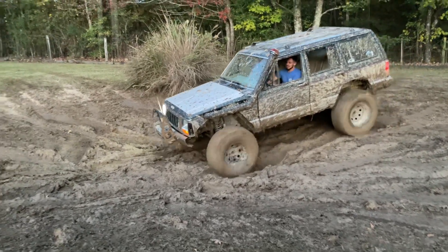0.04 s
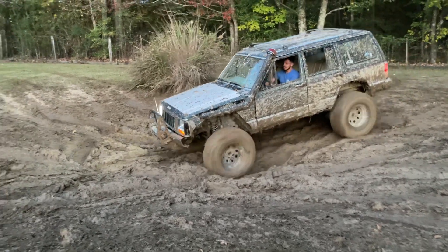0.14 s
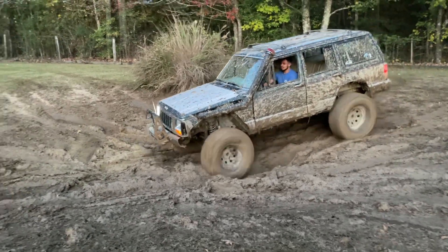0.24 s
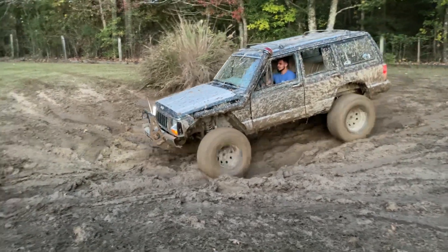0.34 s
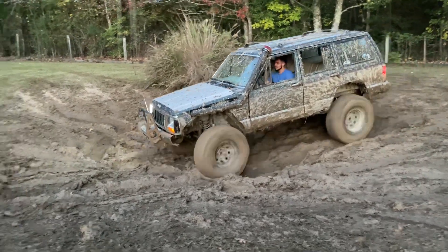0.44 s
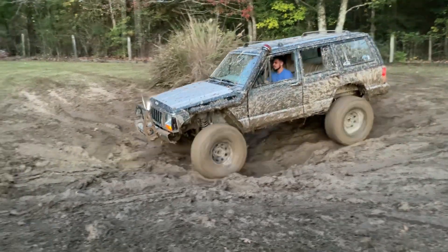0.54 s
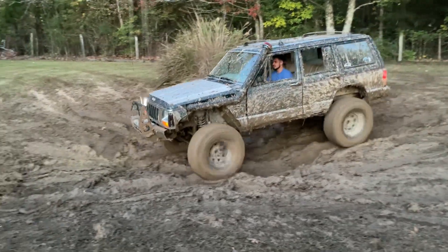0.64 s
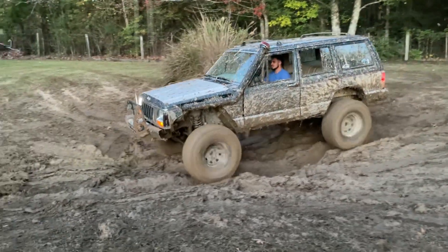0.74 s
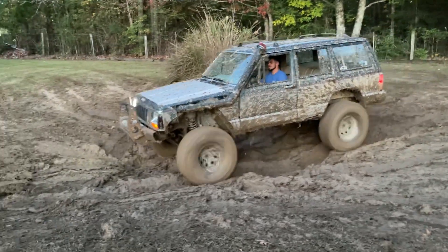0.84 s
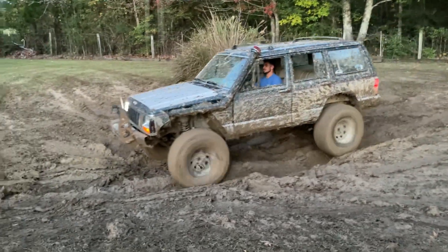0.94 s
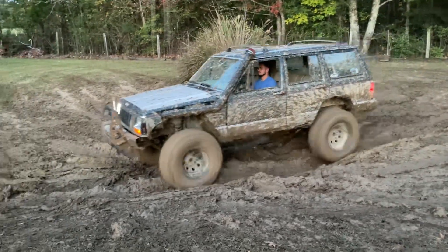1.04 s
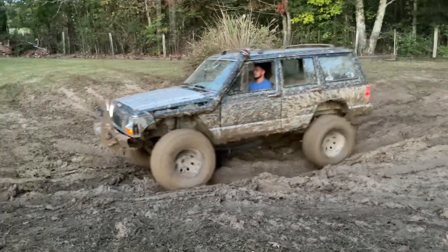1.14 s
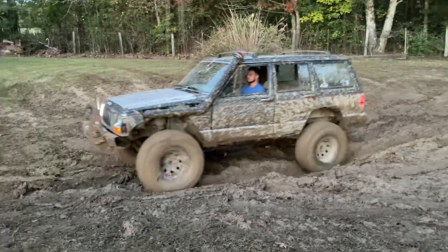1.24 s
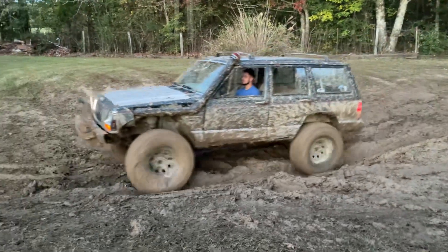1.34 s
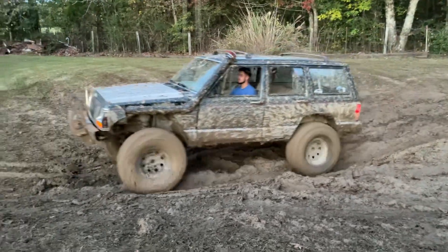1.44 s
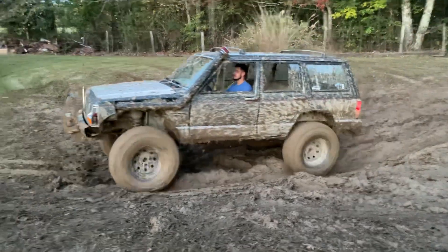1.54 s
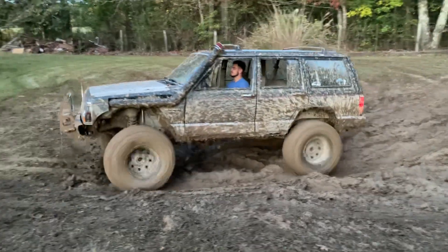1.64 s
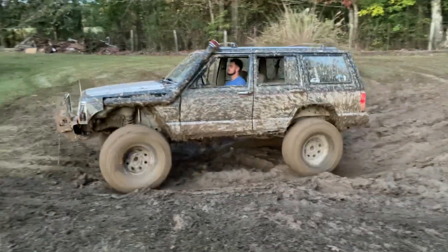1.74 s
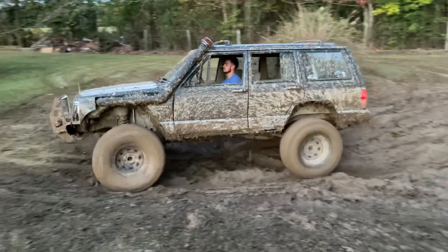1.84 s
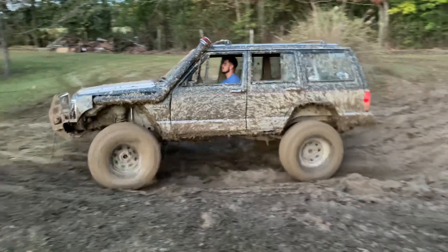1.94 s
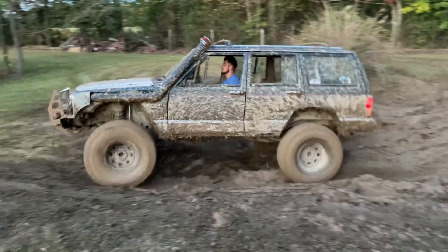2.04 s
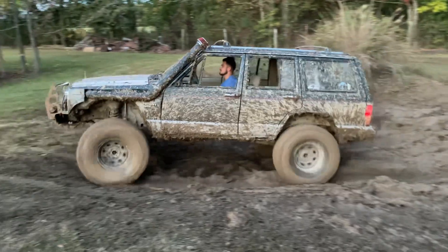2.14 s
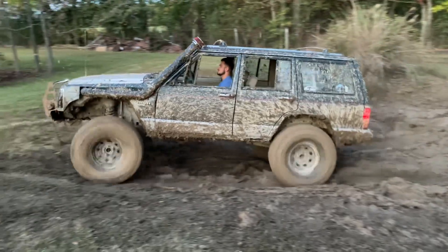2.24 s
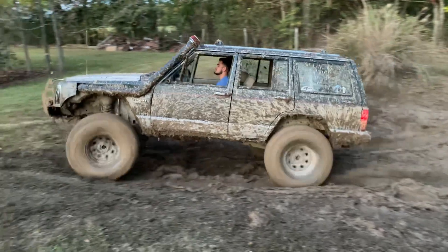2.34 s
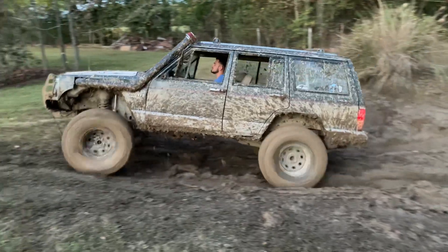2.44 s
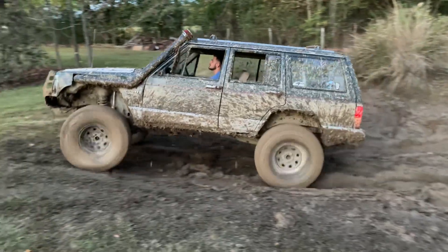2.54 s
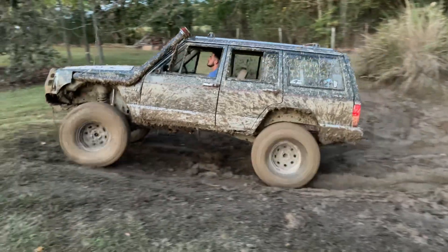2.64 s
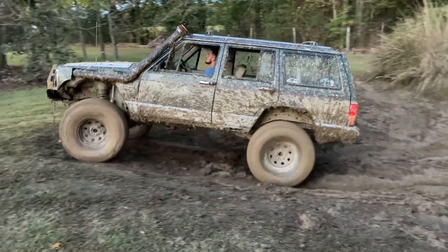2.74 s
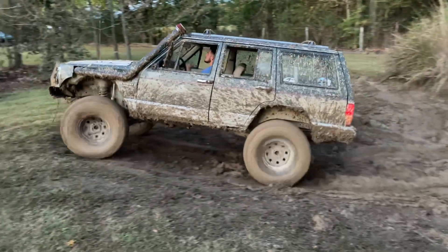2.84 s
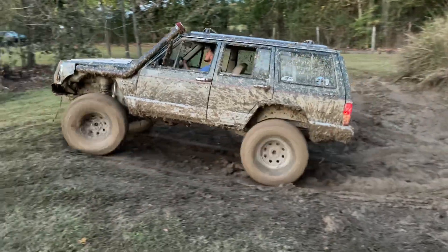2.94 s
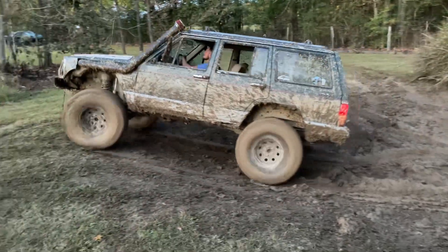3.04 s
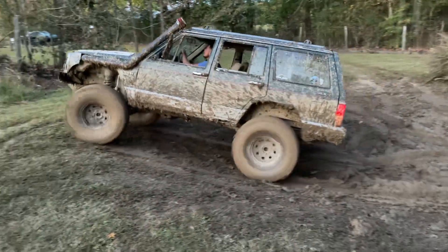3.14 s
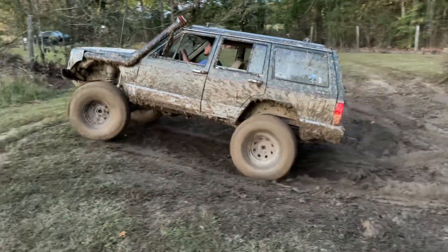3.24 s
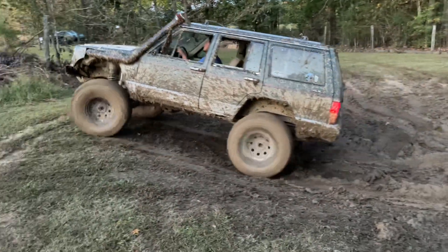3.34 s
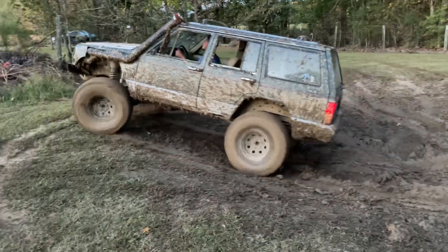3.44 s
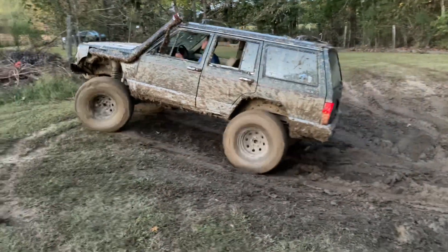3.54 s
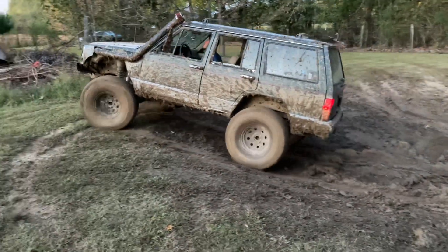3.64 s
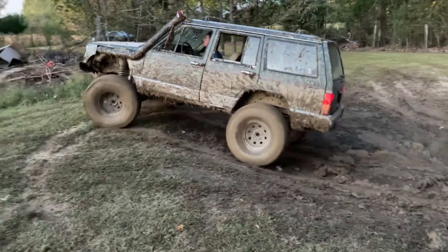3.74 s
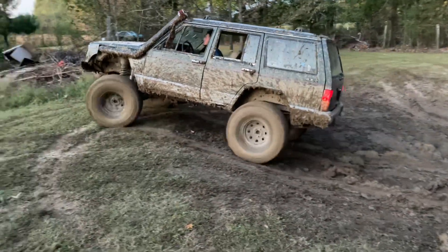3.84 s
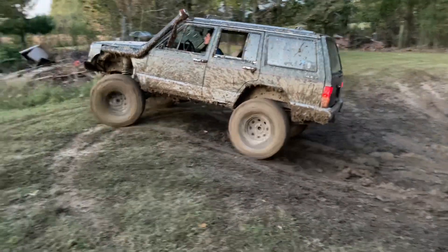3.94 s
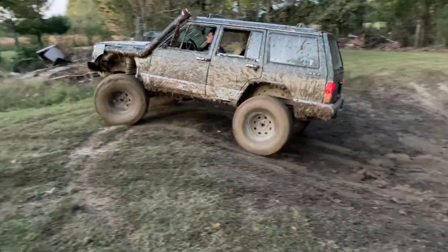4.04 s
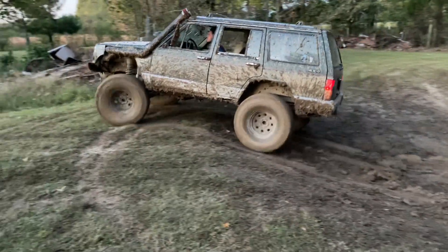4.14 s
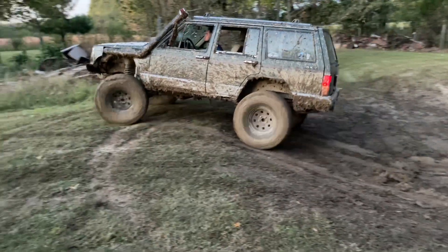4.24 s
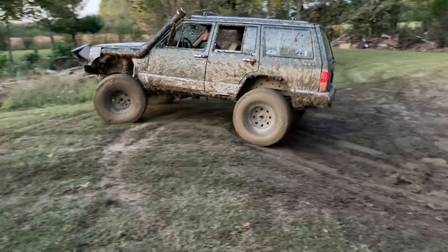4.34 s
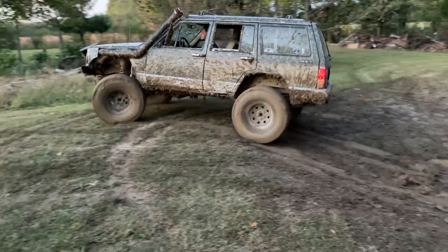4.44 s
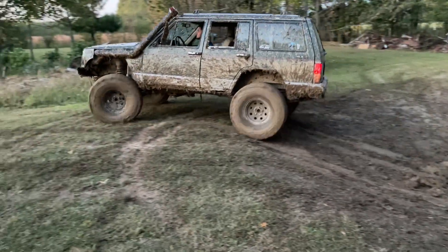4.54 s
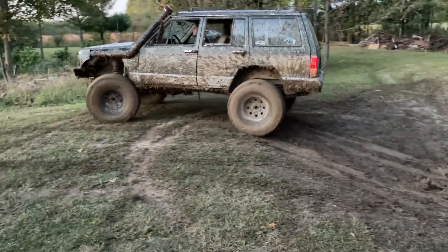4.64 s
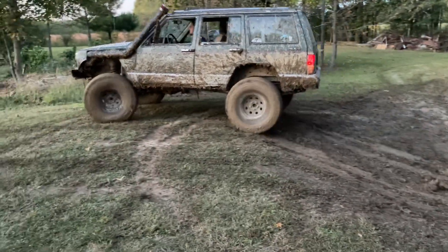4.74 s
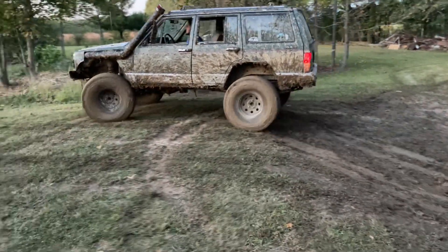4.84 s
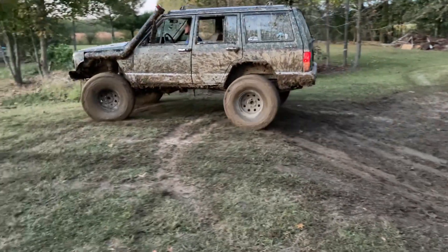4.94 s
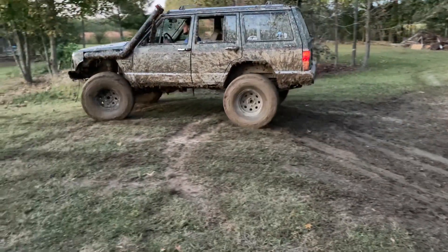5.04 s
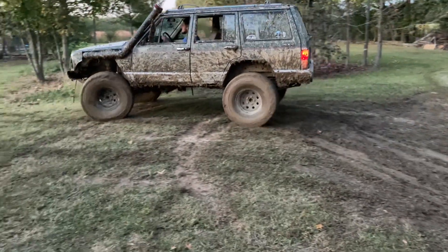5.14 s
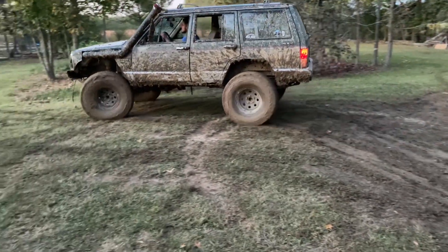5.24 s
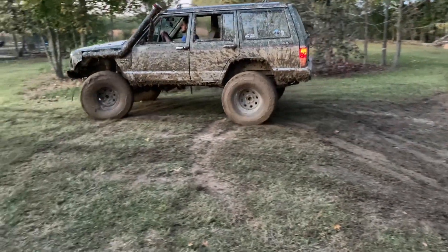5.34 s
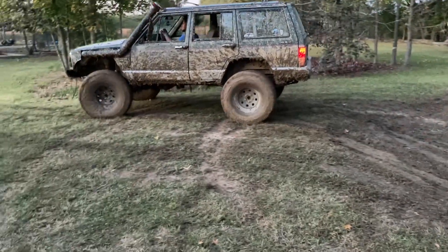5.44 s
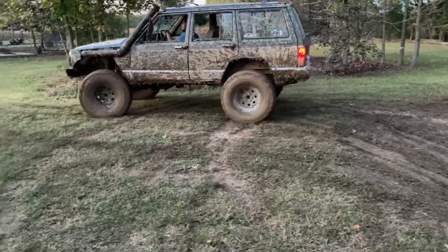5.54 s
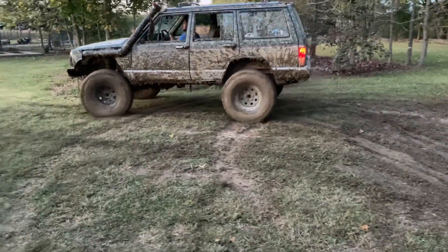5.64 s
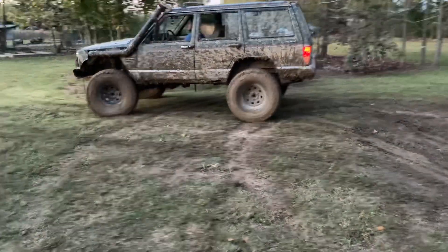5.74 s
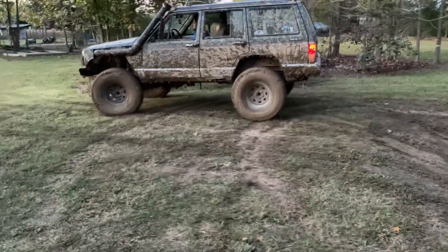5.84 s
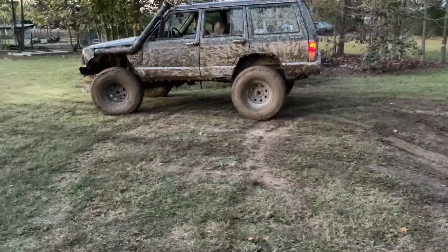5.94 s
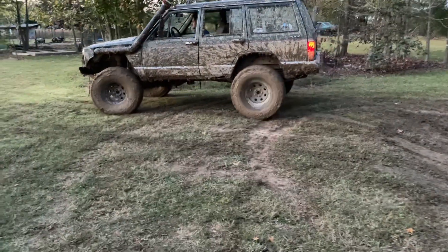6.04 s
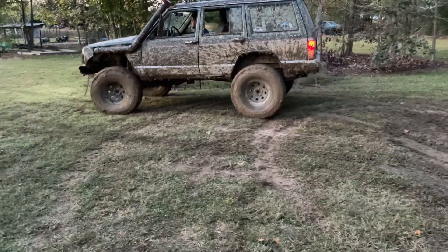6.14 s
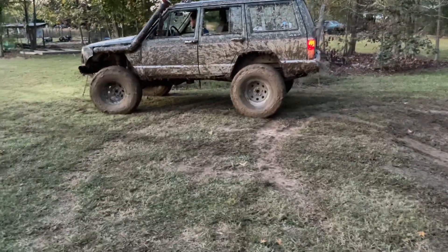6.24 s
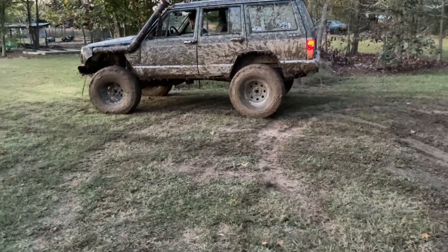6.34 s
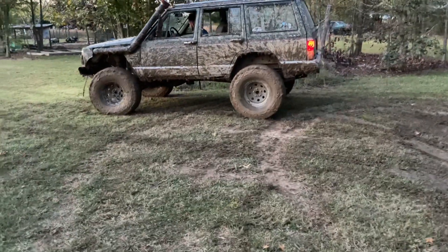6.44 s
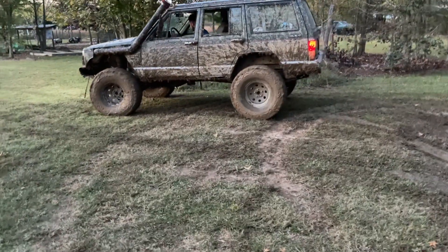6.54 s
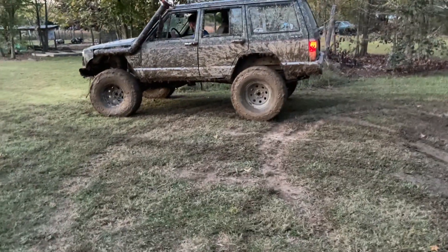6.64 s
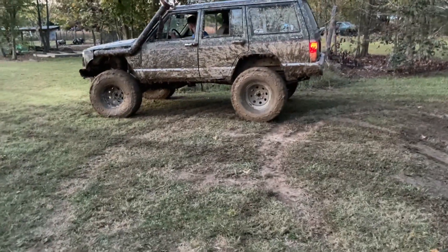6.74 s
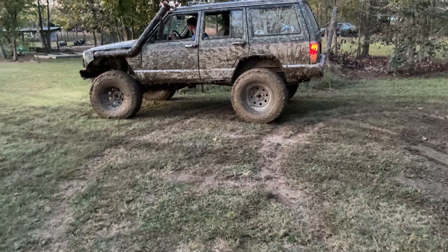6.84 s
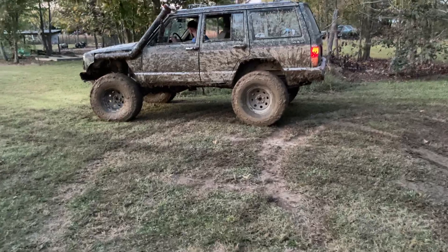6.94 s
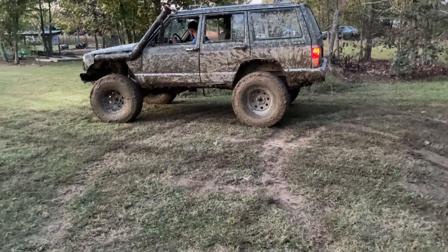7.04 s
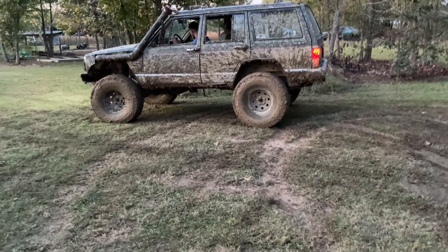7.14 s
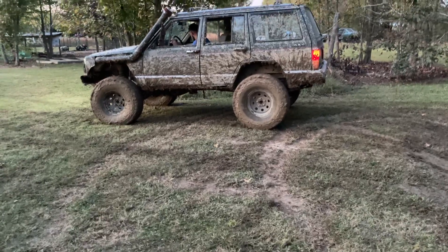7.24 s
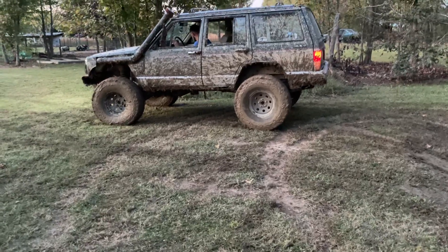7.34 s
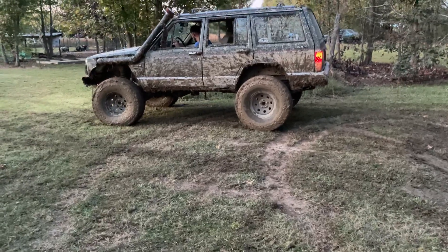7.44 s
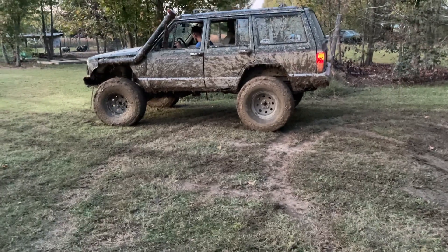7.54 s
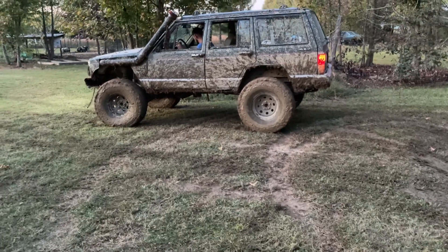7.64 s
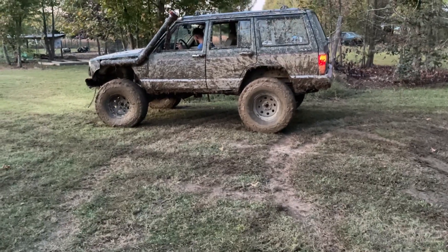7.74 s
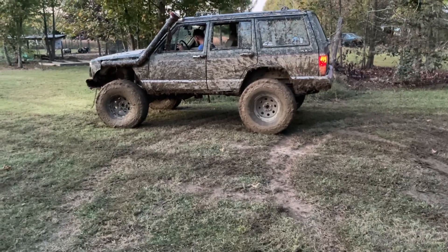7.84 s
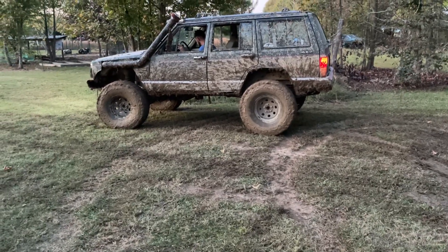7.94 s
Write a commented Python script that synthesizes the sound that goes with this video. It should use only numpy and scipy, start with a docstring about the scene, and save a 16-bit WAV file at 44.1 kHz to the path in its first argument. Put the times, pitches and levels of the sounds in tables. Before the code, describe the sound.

Outdoors, close to a six-cylinder off-road car with an open exhaust. The engine is already climbing and screams to a loud roar, falls, surges again to its highest pitch, then gives three shorter blips. Sharp cracks and dull booms punctuate the falling revs. After four seconds it sinks quickly to a quiet, hissing, ticking idle over a faint low rumble. Close stereo, slightly overloaded at the peaks, short reflections off ground and trees.

```python
"""Six-cylinder car revved outdoors

An off-road car with an open exhaust is revved five times, then falls to idle.
Sines drone at the firing rate; crank orders and random firings growl through pipe resonances.
Noise puffed at each firing is the roar; noise bursts and ringing notes are the pops and booms.
A low rumble and a faint whine lie beneath; two close microphone ports hear it all."""
import sys
import numpy as np
from scipy import signal
from scipy.fft import rfft, irfft, next_fast_len
from scipy.io import wavfile
from scipy.ndimage import uniform_filter1d

SR = 44100
rng = np.random.default_rng(int(sys.argv[2]) if len(sys.argv) > 2 else 0)


def dump_mix(stems):
    """Bounce the given channels to the path in sys.argv[1] as a 16-bit WAV at rate SR."""
    frames = np.atleast_2d(stems).T  # one column per channel
    limited = np.clip(frames, -1, 1)  # hard clip at full scale
    pcm = np.round(limited * 32767).astype(np.int16)
    wavfile.write(sys.argv[1], SR, pcm)


N = 352800


def amp(db):
    """Decibels to amplitude."""
    return 10 ** (np.asarray(db) / 20)


def in_time(rows):
    """Columns of a time table, one value a sample."""
    s, *columns = np.transpose(rows)
    return [np.interp(np.arange(N) / SR, s, c) for c in columns]


def at_hz(points, hz):
    """A frequency table read on a log axis."""
    f, v = np.transpose(points)
    return np.interp(np.log(hz + 1), np.log(f + 1), v)


def shaped(x, response):
    """Filter by a function of frequency."""
    size = next_fast_len(N + 4096)
    return irfft(rfft(x, size) * response(np.fft.rfftfreq(size, 1 / SR)), size)[..., :N]


def band(x, lo_hz, hi_hz):
    """Butterworth band-pass."""
    return signal.sosfilt(signal.butter(2, [lo_hz, hi_hz], "band", fs=SR, output="sos"), x)


def lowpass(x, order, hz):
    """Butterworth low-pass."""
    return signal.sosfilt(signal.butter(order, hz, fs=SR, output="sos"), x)


def highpass(x, order, hz):
    """Butterworth high-pass."""
    return signal.sosfilt(signal.butter(order, hz, "high", fs=SR, output="sos"), x)


def resonance(x, hz, width_hz):
    """Two poles, gain 1 on top."""
    r = np.exp(-np.pi * width_hz / SR)
    feedback = [1, -2 * r * np.cos(2 * np.pi * hz / SR), r * r]
    return signal.lfilter((1 - r * r) / 2 * np.array([1, 0, -1]), feedback, x + 1e-18)


def evened(x, lo_hz, hi_hz):
    """Scale so that the running rms of one band is about 1."""
    power = uniform_filter1d(band(x, lo_hz, hi_hz) ** 2, size=6001)
    return x / np.sqrt(uniform_filter1d(power, size=6001) + 1e-20)


def drift(corner_hz):
    """Slow random curve, spread 1: noise through a double pole, one point per 40 samples."""
    r = np.exp(-80 * np.pi * corner_hz / SR)
    slow = signal.lfilter([1], [1, -2 * r, r * r], rng.standard_normal(N // 40 + 2002))[2000:]
    return np.interp(np.arange(N) / 40, np.arange(len(slow)), slow / slow.std())


def rumble(db):
    """Low outdoor background: band noise whose level drifts."""
    noise = band(rng.standard_normal(N), 26, 97)
    return amp(db + 2 * drift(3.8)) * noise / noise.std()


WHINE_HZ, WHINE_STAGE_WIDTH_HZ, WHINE_RMS_DB = 4260, 90, -83


def whine():
    """Faint thin whine: noise through two equal narrow resonances."""
    thin = resonance(rng.standard_normal(N), WHINE_HZ, WHINE_STAGE_WIDTH_HZ)
    thin = resonance(thin, WHINE_HZ, WHINE_STAGE_WIDTH_HZ)
    return amp(WHINE_RMS_DB) * thin / thin.std()


# exhaust resonances: (frequency [Hz], width [Hz], gain [dB])
PIPE_MODES = [(65, 17, -4.5), (112, 58, -3), (259.6, 47, 4), (312, 69, 0), (455.8, 32.7, 2.5),
              (549, 50, -3), (682, 52, -8), (970, 150, -12.5), (1080, 127, -6), (1623, 160, -5),
              (2100, 130, -12.5), (3440, 890, -13)]


def pipe(x):
    """Parallel exhaust resonances, signs alternating."""
    return sum((-1) ** k * amp(db) * resonance(x, hz, width_hz)
               for k, (hz, width_hz, db) in enumerate(PIPE_MODES))


# dull afterfire booms in the pipe: (time [s], level [dB], note [Hz])
BOOM_EVENTS = [(0.517, -36, 84.4), (0.754, -24.5, 74), (1.022, -25.5, 63.5), (1.249, -20, 87),
               (1.666, -27, 143), (1.894, -31.5, 85), (2.011, -17.5, 140), (2.117, -26, 87),
               (2.142, -18, 125), (2.432, -29.5, 89), (2.668, -35, 86), (2.827, -22, 73),
               (3.02, -25.5, 137), (3.21, -31, 141), (3.375, -25.5, 76), (3.577, -29, 117),
               (3.944, -35, 80)]


def booms(t60_s, puff_db, puff_top_hz):
    """Each boom rings one low note and shoves a short rough puff through the pipe."""
    out, age_s = np.zeros(N), np.arange(SR // 4) / SR
    rough = pipe(band(rng.standard_normal(N), 27, puff_top_hz))
    rough /= rough.std()
    for s, db, hz in BOOM_EVENTS:
        i = round(s * SR)
        swell = amp(db - 60 * age_s / t60_s) * np.minimum(age_s / 0.0023, 1)
        note = np.sin(2 * np.pi * hz * age_s)
        out[i:i + len(age_s)] += swell * (note + amp(puff_db) * rough[i:i + len(age_s)])
    return out


# gas jet colour: (frequency [Hz], relative density [dB per Hz])
JET_COLOUR = [(600, 1), (900, 0.5), (1500, -4.5), (2500, -7), (4500, -14), (6500, -17), (8300, -17),
              (10500, -20.5), (13000, -29.5)]


def jet_noise():
    """Turbulent gas: white noise given the jet colour."""
    return shaped(rng.standard_normal(N), lambda f: amp(at_hz(JET_COLOUR, f)))


POP_T60_S = 0.074
# unburnt fuel cracks at the tailpipe: (time [s], level [dB], low-pass corner [Hz])
POP_EVENTS = [(1.2446, -23, 8000), (1.313, -22, 8040), (1.382, -29, 7040), (2.016, -15, 2500),
              (2.038, -8.5, 1500), (2.059, -23, 1500), (2.121, -16, 6040), (2.515, -25, 13000),
              (2.584, -20.5, 9100), (2.824, -28.5, 2980), (2.911, -25.5, 12000), (2.975, -20, 9000),
              (3.1907, -22, 12000), (3.272, -24.5, 11000), (3.356, -29, 12000), (3.427, -28, 8000),
              (3.533, -23.5, 12000), (3.590, -31, 13000), (3.971, -27, 5000), (4.056, -24, 12000),
              (4.183, -29, 10900), (4.2969, -41, 2000), (4.37, -26, 11000), (4.4335, -22.5, 13000),
              (4.6244, -23.5, 12000), (5.796, -46, 5960), (6.797, -38.5, 1990), (7.891, -39, 2500),
              (7.914, -42, 2000), (7.955, -33.5, 1950)]


def pops(tail_db, tail_stretch):
    """Sharp bursts of jet-coloured noise, each with a fainter, slower tail from the trees."""
    t, out = np.arange(N) / SR, np.zeros(N)
    noise = jet_noise()
    noise = noise / (2 * band(noise, 900, 5900).std())
    for s, db, dull_hz in POP_EVENTS:
        i = round(s * SR)
        age_s = t[:min(SR // 3, N - i)]
        fall = amp(-60 * age_s / POP_T60_S)
        fall = fall + amp(tail_db - 60 * age_s / (tail_stretch * POP_T60_S))
        dull = lowpass(noise[i:i + len(age_s)], 2, min(dull_hz, 16000))
        out[i:i + len(age_s)] += amp(db) * np.minimum(age_s / 0.0045, 1) * fall * dull
    return out


# tailpipe resonances that the gas sets rasping: (frequency [Hz], width [Hz], relative level [dB])
RASP_MODES = [(467, 99, 6), (677, 67, 0.5), (949, 51, -1.5), (1211, 166, -1), (1541, 99, -4),
              (2185, 140, -5), (3490, 500, -10), (4285, 370, -15.5), (5580, 600, -16.5)]


def rasp(count, throb, steady, spread_db, patchy_db, ring_db, low_db):
    """Each firing blows noise at random strength into each tailpipe resonance; levels drift slowly."""
    out, chance, noise = 0, rng.standard_normal((4000, len(RASP_MODES))), rng.standard_normal(N)
    for k, (hz, width_hz, db) in enumerate(RASP_MODES):
        # low modes throb less
        puffs = min(hz / 1300, 1) * throb * amp(spread_db * chance[count, k])
        blown = noise * (steady + puffs)
        db = db + patchy_db * drift(7.0) + (ring_db if k == 5 else 0)
        # the top modes rise as the ring sinks
        db = db + (0.35 * low_db if hz < 1300 else -0.3 * ring_db * (hz > 4000))
        rung = resonance(resonance(blown, hz, 1.5 * width_hz), hz, 1.5 * width_hz)
        out = out + amp(db) * rung / np.sqrt(width_hz)
    return out / band(out, 850, 2700).std()


# tailpipe swings round as the car passes: (time [s], rasp level [dB], treble tilt [dB per octave],
# ground echo share [0-1], hiss below 1.35 kHz [dB], ring near 2.2 kHz [dB], ground echo lag [ms])
TAILPIPE_HEADING = [(0, -2.5, -0.2, 0.044, -12, -5.5, 0.63), (.55, -7, -0.3, 0.1, -10.5, -4, 0.47),
                    (1.0, -2.5, -2, 0.073, 0.5, 1.5, 0.53), (1.5, -6.5, 0.1, 0.07, -9, -4.5, 0.69),
                    (1.9, -2.5, 1.1, 0.076, -11, -8, .62), (2.1, -1.5, -1.5, 0.044, -9, -3.5, 0.69),
                    (2.8, -4, 0.5, 0.09, 6.5, -12, 0.51), (3.1, -3, 1.5, 0.28, 0, -8, 0.634),
                    (3.7, 4, 1.4, 0.3, 0.5, -16.5, .58), (4.15, 1.5, -3, 0.3, -2.5, -9, 0.56),
                    (4.75, 8, -1, 0.12, 5.5, -2.5, 0.546), (5.3, 10.5, 2, 0.042, 0, -3.5, 0.49),
                    (6.5, 9.5, 2.5, 0.21, 1, 0.5, 0.544), (8, 10, 3, 0.1, 4, 0.5, 0.63)]


def jet(firings, firing_hz, puff_s, steady, spread_db):
    """Hiss puffed out at each firing: ticks at idle, a roar at speed, over a ringing rasp."""
    # puff_s holds at 3 kHz, spread_db at idle, steady at speed
    rasp_db, tilt_db, echo, low_db, ring_db, lag_ms = in_time(TAILPIPE_HEADING)
    spread_db = spread_db * np.interp(firing_hz, [50, 130], [1, .45])
    steady = steady * np.interp(firing_hz, [50, 130], [.5, 1])
    patchy_db = np.interp(firing_hz, [50, 130], [1.2, 3.2])
    count = np.floor(firings).astype(int)
    since_s = (firings - count) / firing_hz
    hiss = jet_noise()
    hiss, out = hiss / band(hiss, 1800, 4900).std(), 0
    edges_hz, chance = np.geomspace(780, 14500, 17), rng.standard_normal((4000, 17))
    for k in range(16):   # each puff has its own colour and dies sooner in the treble
        octaves = np.log2(edges_hz[k] / 3000)
        puff = np.exp(-since_s / (puff_s * .8 ** octaves)) * np.minimum(since_s / .0025, 1)
        strength = amp(spread_db * (chance[count, k] + 0.19 * chance[count, 16]))
        part = shaped(hiss, lambda f: (f >= edges_hz[k]) & (f < edges_hz[k + 1]))
        colour_db = tilt_db * octaves + low_db * (edges_hz[k] < 1300) + patchy_db * drift(11.0)
        out = out + (steady * 1.97 ** octaves + strength * puff) * amp(colour_db) * part
    throb = np.exp(-since_s / puff_s) * np.minimum(since_s / .003, 1)
    ringing = rasp(count, throb, 3 * steady, spread_db, patchy_db, ring_db, low_db)
    out = evened(out, 1300, 7000) + amp(rasp_db) * ringing
    bounced = np.interp(np.arange(N) - lag_ms * SR / 1000, np.arange(N), out)
    return amp(.8 * drift(3.0)) * (out + np.clip(echo, 0, .9) * bounced)


def climb_rate(firing_hz):
    """Smoothed change of firing rate [Hz/s]."""
    return uniform_filter1d(np.gradient(firing_hz) * SR, size=3001)


# low crank orders: (order, level on the overrun [dB], level while revs climb [dB])
ORDER_LEVELS = [(1, -8, -4.5), (2, 0.5, 1.5), (4, -0.5, -5), (5, -3, 3), (7, -12.5, 5.5), (8, -9, 10.5),
                (9, 1, 3), (10, -4, -0.5), (11, -5, 6), (12, -1, -1), (13, -10, 7), (14, -8, -1.5),
                (15, -2, 7), (16, -5.5, -8), (17, -5, -7), (18, -3.5, -10.5)]


def crank_orders(firings, firing_hz):
    """Multiples of the crank rate but the drone's two; unequal cylinders make those off firing rate."""
    out, start_rad = np.zeros(N), rng.uniform(0, 2 * np.pi, 48)
    share_db = list(rng.normal(-6, 3, 48))   # high orders differ at random
    climb = climb_rate(firing_hz)
    for order, overrun_db, climbing_db in ORDER_LEVELS:
        share_db[round(order)] = np.interp(climb, [-20, 40], [overrun_db, climbing_db])
    wavers = [drift(13.0) for k in range(12)]
    uneven_db = np.interp(firing_hz, [50, 130], [-9, 0])   # cylinders match best at idle
    waver_db = np.interp(firing_hz, [50, 130], [1.5, 4.6])
    overrun = np.interp(climb, [-80, -20], [1, 0]) * np.interp(firing_hz, [110, 170], [0, 1])
    top_order = 26 - 15 * overrun   # fewer stay clear on a fast overrun
    for k in range(1, 40):
        if k in (3, 6):
            continue
        db = (uneven_db if k % 3 else 0) + share_db[k] + waver_db * wavers[k % 12]
        audible = np.clip(3 - k * firing_hz / 3 / 800, 0, 1) / (1 + (k / top_order) ** 6)
        out += amp(db) * audible * np.sin(2 * np.pi * k * firings / 3 + start_rad[k])
    return out


INTAKE_DB, GLIDE_S_PER_HZ = 0.5, .0004


def exhaust(firings, firing_hz, body_db, growl_db):
    """Crank orders plus firing-to-firing chance through the pipe, split into body and growl."""
    at = np.flatnonzero(np.diff(np.floor(firings))) + 1
    misfit = np.zeros(N)
    misfit[at] = rng.standard_normal(4000)[:len(at)] * SR / firing_hz[at]
    # burning is steady while revs climb, ragged when they fall
    climb = climb_rate(firing_hz)
    misfit *= np.interp(climb, [-60, 0, 60], [2.0, 1.0, .15])
    strong = np.zeros(N)   # one firing a turn is harder
    strong[at] = SR / firing_hz[at] * np.where(np.arange(len(at)) % 3, .33, 1)
    # each thump is drawn out into a rising glide, 200-350 Hz
    strong = shaped(strong, lambda f: np.exp(-1j * np.pi * GLIDE_S_PER_HZ * np.clip(f - 200, 0, 150) ** 2))
    silencer = band(.35 * misfit + 2.2 * strong, 225, 325)   # rings on every firing
    lumps = band(misfit, 59.0, 77) * np.interp(firing_hz, [50, 100], [.1, .9])
    misfit = lowpass(misfit, 2, 1100)
    orders = crank_orders(firings, firing_hz)
    piped = pipe(orders + .14 * misfit + .35 * silencer)
    # under load the intake lets the middle orders out past the pipe
    piped = piped + np.interp(climb, [30, 210], [0, amp(INTAKE_DB)]) * band(orders, 380, 1190)
    body = lowpass(piped + 1.02 * lumps, 4, 345)
    growl = highpass(piped, 4, 345)
    return amp(body_db) * evened(body, 40, 400) + amp(growl_db) * evened(growl, 210, 1100)


def drone(firings, levels_db, waver_db):
    """First multiples of the firing rate as sines wavering in level and phase."""
    out = 0
    for k, db in enumerate(levels_db):
        level = np.sqrt(2) * amp(db + waver_db * drift(30.0))
        out = out + level * np.sin(2 * np.pi * (k + 1) * firings + 0.17 * drift(59))
    return out


# engine speed: (time [s], firing rate [Hz])
ENGINE_SPEED = [(0, 108.2), (.25, 154.7), (.44, 198.7), (.69, 253.4), (.78, 254.9), (1.06, 210.8),
                (1.26, 180.3), (1.4, 157.2), (1.51, 169.7), (1.79, 236), (2.0, 277.9), (2.15, 253.2),
                (2.23, 230.9), (2.38, 214.1), (2.55, 192.6), (2.69, 173.7), (2.93, 147.1), (3.15, 168.5),
                (3.23, 153.5), (3.37, 138.5), (3.52, 114.4), (3.61, 121.7), (3.78, 149.3), (3.85, 154.6),
                (4.05, 127.1), (4.18, 103.8), (4.49, 80.03), (4.71, 58.85), (4.99, 48.27), (5.38, 44.2),
                (5.89, 41.8), (6.21, 35.35), (6.95, 35.3), (7.26, 35.7), (7.83, 41.2), (8, 43)]


def engine_speed():
    """Firing rate [Hz], three firings a crank turn."""
    firing_hz, = in_time(ENGINE_SPEED)
    return firing_hz


# pedal: (start [s], drone swell [s], roar swell [s], shut start [s], shutting [s], then open-throttle
# offsets: 1st multiple [dB], 2nd multiple [dB], silencer body [dB], growl [dB], roar [dB])
PEDAL_PRESSES = [(-.2, .1, .1, 0.735, .03, -2, 0.5, -7, 2, -1),
                 (1.367, 0.25, 0.26, 2.02, .08, 1.5, 0.5, -2, 3.5, -6),
                 (2.19, 0.026, 0.024, 2.458, 0.013, 1.5, -6.5, -3.5, -3, -10.5),
                 (2.872, 0.078, 0.17, 3.058, 0.1, -8.5, 1, -3, -12, -11),
                 (3.525, 0.082, 0.082, 3.78, 0.09, -8, -1, -4.5, -11, -15)]


def pedal():
    """Swell of drone and roar, 0-1, and each layer's press strength [dB]."""
    t, swell, strength_db = np.arange(N) / SR, np.zeros((2, N)), np.zeros((5, N))
    for start_s, drone_s, roar_s, shut_s, shutting_s, *db in PEDAL_PRESSES:
        opening = (t - start_s) / [[drone_s], [roar_s]]
        press = np.clip(np.minimum(opening, 1 - (t - shut_s) / shutting_s), 0, 1)
        swell += press
        strength_db += (press[0] > 0) * np.array(db)[:, None]
    return np.minimum(swell, 1), strength_db


# drone falters: (time [s], half length [s], 1st multiple change [dB], 2nd multiple change [dB])
DRONE_FALTERS = [(0.04, 0.049, -1, -6), (0.425, 0.068, -4, -10), (0.575, 0.024, -10, -11),
                 (0.746, 0.022, -10, -2), (1.3, 0.061, -27, -1), (1.667, 0.086, -1.5, -7),
                 (1.95, 0.089, -14, 1.5), (2.052, 0.055, -10.5, 10.5), (2.161, 0.032, -25.5, -33),
                 (2.487, 0.031, -17, -11), (2.888, 0.098, -13, 3.5), (3.162, 0.036, -12, 7.5),
                 (3.52, 0.029, -11, -13)]


def falter(db):
    """Triangular dips or jumps in the drone's two levels, in place."""
    t = np.arange(N) / SR
    for s, half_s, *change_db in DRONE_FALTERS:
        db[:2] += np.array(change_db)[:, None] * np.clip(1 - abs(t - s) / half_s, 0, 1)


# layer levels, throttle shut and open: (firing rate [Hz], 1st multiple [dB], 2nd multiple [dB],
# silencer body [dB], growl [dB], jet roar [dB])
SHUT_LEVELS = [(35.5, -64, -27, -35.5, -58.5, -64), (44, -44, -35.5, -40, -59.5, -65.5),
               (53.4, -40, -49.5, -42, -61, -68), (83, -39.5, -48, -33.5, -44, -61),
               (126, -34, -30, -28.5, -38, -56), (156.2, -30.5, -25, -36.5, -35, -49.5),
               (203.4, -22.5, -35.5, -28, -31.5, -42.5), (239.6, -15.5, -37, -40.5, -36, -32.5),
               (274.3, -12.5, -21.5, -26.5, -17, -30.5)]
OPEN_LEVELS = [(107, -6, -34.5, -33, -18.5, -22), (148.3, -10.5, -19, -33.5, -28.5, -20),
               (198, -18, -26.5, -22, -20.5, -18.5), (244, -14, -26, -25, -23, -18.5),
               (260, -12.5, -25.5, -19.5, -23.5, -18)]
# loudness of exhaust note and of roar over time: (time [s], exhaust note [dB], roar [dB])
LOUDNESS = [(0, 0, 5), (.2, 1, -1.5), (.38, 1.5, 1.5), (.65, -2.5, -3), (.85, 3.5, 4), (1.2, 2, 2.5),
            (1.3, 1, -0.5), (1.5, -2, 3.5), (1.72, -5, 0.5), (1.95, -4.5, 4.5), (2.08, -2.5, -2.5),
            (2.43, -4.5, -10.5), (2.49, -4, -10), (2.56, -3.5, 1), (2.65, -4.5, -2.5), (2.85, 0, -3),
            (3.04, -2.5, 2.5), (3.2, -0.5, -2), (3.5, 0.5, -2), (3.62, -2, -0.5), (3.8, 0, 0.5),
            (4.2, -1.5, -3), (4.7, 1, -4), (5.2, -2, -4.5), (5.9, -3, -0.5), (6.3, -6.5, -3.5),
            (7.26, -1, 0.5), (7.82, 0, 0.5), (7.95, 2, 1.5), (8, -0.5, 3)]


def layer_levels(firing_hz):
    """Each layer moves between shut- and open-throttle levels for the engine speed."""
    (swell, strength_db), loudness_db = pedal(), np.array(in_time(LOUDNESS))
    shut_db, open_db = (np.array([at_hz(np.array(rows)[:, [0, k]], firing_hz) for k in range(1, 6)])
                        for rows in (SHUT_LEVELS, OPEN_LEVELS))
    # growl swells with the roar but follows the note's loudness
    db = shut_db + swell[[0, 0, 0, 1, 1]] * (open_db + strength_db - shut_db)
    db = db + loudness_db[[0, 0, 0, 0, 1]]
    falter(db)
    return db


# scattered sound: (frequency [Hz], level [dB])
SCATTER_LEVEL = [(60, -70), (250, -36), (1000, -15), (3000, -8.5), (6000, -6), (12000, -15.5)]


def scattered(x):
    """Ground and trees: a short random smear, opposite in sense at the two ports."""
    age_s = np.arange(3000) / SR
    smear = rng.standard_normal(len(age_s)) * amp(-60 * age_s / 0.13) * np.minimum(age_s / .012, 1)
    wet = signal.fftconvolve(x, smear / np.sqrt(np.sum(smear ** 2)))[:N]
    return shaped(wet, lambda f: amp(at_hz(SCATTER_LEVEL, f))) * [[1], [-1]]


# level between ports: (frequency [Hz], left minus right [dB])
PORT_LEVEL = [(60, -.1), (250, -.6), (500, -2.4), (1200, -2.2), (2400, 1.4), (5000, 2.6), (7400, 0)]
# phase between ports: (frequency [Hz], left lead [rad])
PORT_LEAD = [(0, 0), (690, -.1), (3010, .7), (4050, .1), (5080, .6), (5860, 0), (6900, -.9), (7700, -3.14),
             (8900, -3.14), (9500, -4.7), (13500, -4.8)]


def ports(x):
    """Two ports differing in level and phase, in opposition near 8 kHz."""
    side = np.array([[.5], [-.5]])
    return shaped(x, lambda f: amp(side * at_hz(PORT_LEVEL, f)) * np.exp(1j * side * at_hz(PORT_LEAD, f)))


def scene():
    """Sum the layers, then add direct and scattered sound at the ports."""
    firing_hz = engine_speed()
    first_db, second_db, body_db, growl_db, roar_db = layer_levels(firing_hz)
    firings = np.cumsum(firing_hz) / SR
    mix = rumble(db=-47.0) + whine()
    mix += booms(t60_s=0.28, puff_db=3.0, puff_top_hz=325)
    mix += pops(tail_db=-35.5, tail_stretch=17.0)
    mix += amp(roar_db) * jet(firings, firing_hz, puff_s=.007, steady=.14, spread_db=2.8)
    mix += exhaust(firings, firing_hz, body_db, growl_db)
    mix += drone(firings, [first_db, second_db], waver_db=1.03)
    return ports(mix) + scattered(mix)


STOPBAND_HZ = 13950


def record(dry):
    """The deepest bass is lost, peaks are rounded, the top is cut."""
    rounded = 1.256 * np.tanh(highpass(dry, 2, 45) / 1.155)
    return signal.sosfilt(signal.cheby2(14, 45, STOPBAND_HZ, fs=SR, output="sos"), rounded)


dry = scene()
out = record(dry)
dump_mix(out)
```